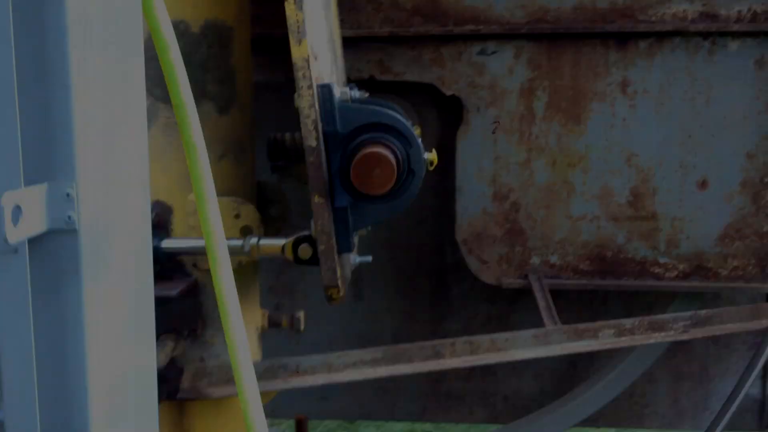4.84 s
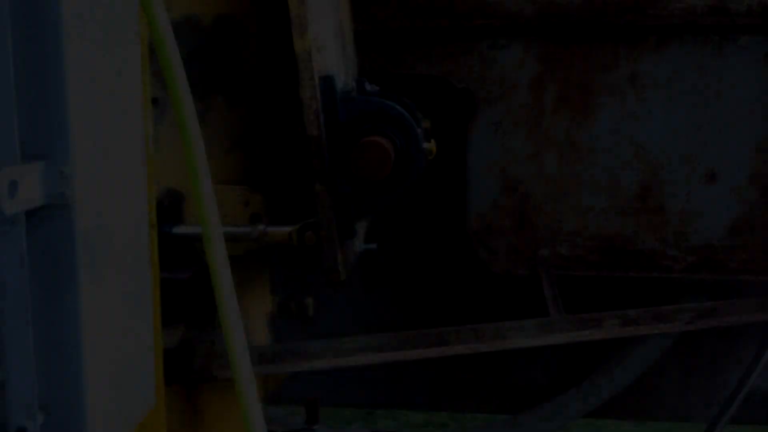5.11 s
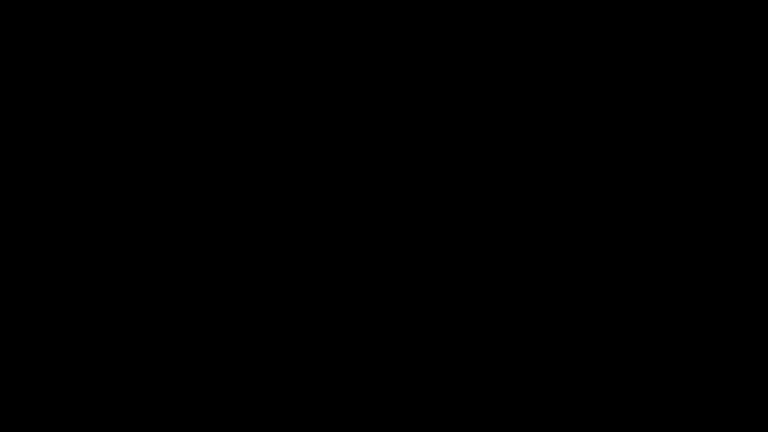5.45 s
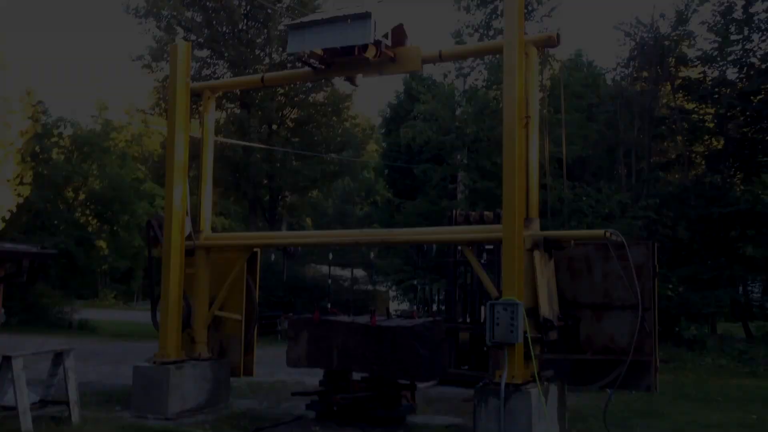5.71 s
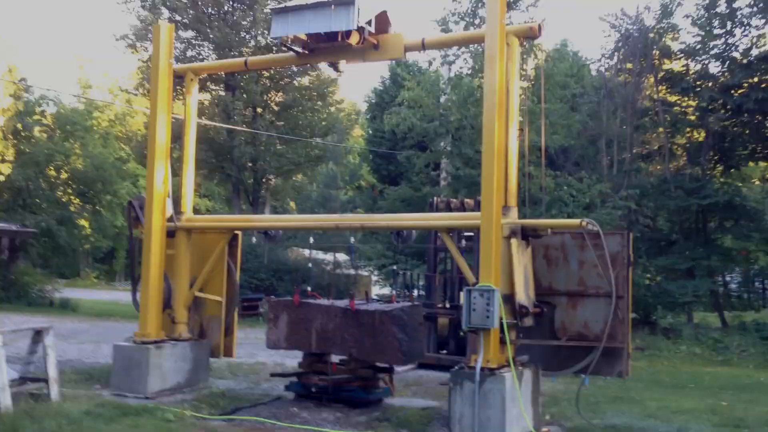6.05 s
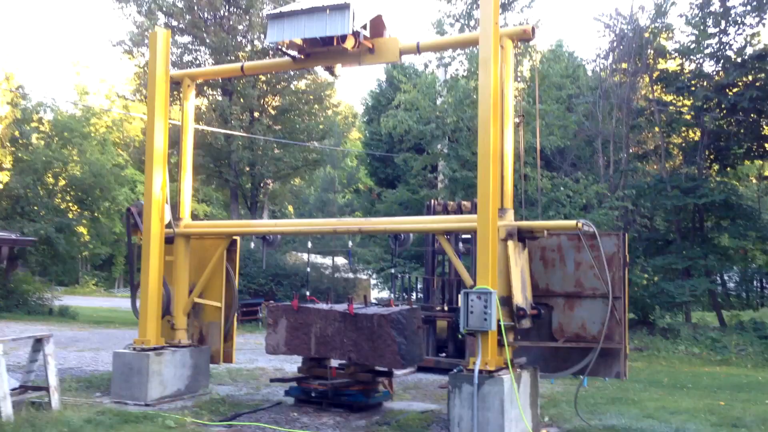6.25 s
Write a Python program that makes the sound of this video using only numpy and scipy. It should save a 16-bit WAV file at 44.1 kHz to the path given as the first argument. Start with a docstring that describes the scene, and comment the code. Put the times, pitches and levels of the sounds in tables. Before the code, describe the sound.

Heard up close outdoors, a running wire grinds through stone with a steady spraying hiss, a rough rasp and small chirping catches. Underneath, the steel frame drones and the motor hums unevenly, with occasional soft knocks. The sound dips to silence for an instant about two thirds through, and the same sawing returns from farther off, with a much weaker hum.

```python
"""An open yard, in mono: a diamond wire saw grinds through a block of stone.
Grit chips the stone and rasps in the cut, beads catch and squeak, slurry hisses off the wire,
the steel frame drones and the drive knocks in it. Once a lap the wire loop bites harder, then runs
slack; at times it skids. Soft, deep thuds sound in the rumble.
The sound fades out beside the machine and fades in again from across the yard."""
import sys
import numpy as np
from scipy import signal
from scipy.fft import rfft, irfft
from scipy.io import wavfile
from scipy.ndimage import uniform_filter1d, map_coordinates

SR = 44100
rng = np.random.default_rng(int(sys.argv[2]) if len(sys.argv) > 2 else 0)


def store_wav(level_fs):
    """Save 16-bit WAV to argv[1]."""
    pcm = np.round(np.clip(np.atleast_2d(level_fs), -1, 1) * 32767)
    wavfile.write(sys.argv[1], SR, pcm.T.astype(np.int16))


N = 338688
T = np.arange(N) / SR
BINS_HZ = np.maximum(np.arange(N // 2 + 1) * SR / N, 1)
MOVE_S, FADE_S = 5.461, .5  # near to far


# wire feed into the stone: t/s, level/dB
NEAR_FEED = [(0, 2), (.55, 0.1), (.75, 0.5), (1.9, 0), (2.25, -0.1), (3.6, -0.35), (4.6, -0.5), (4.95, -2),
             (5.25, -0.7)]
FAR_FEED = [(5.9, -0.95), (6.05, 0.17), (6.35, -0.61), (6.5, 0.32), (6.63, 0.47), (6.72, 1.3), (7, -0.51),
            (7.2, 0.28), (7.35, 2.2), (7.5, 1), (7.62, -1)]
# wire skids: t/s (centre), level/dB, half length/s
SKIDS = [(0.184, -7, 0.027), (0.72, -8, 0.031), (0.98, -3, 0.018), (1.55, -0.5, 0.027), (2.172, -3.5, .025),
         (2.41, -8, 0.01), (2.814, -7.5, 0.042), (3.04, -1.5, 0.038), (3.394, -4, 0.021),
         (3.625, -2, 0.034), (4.936, -3, 0.14), (5.66, -10, .035), (5.94, -6, 0.028), (6.34, -11, 0.025),
         (6.632, -2.5, 0.047), (7.01, -6, 0.041), (7.148, -7, 0.071), (7.575, -4, 0.039)]
def saw(far, bite_s, rasp_db, block_db, hiss_db):
    """Feed, bite and slack press the wire on the stone, which yields unevenly; skids drop the rasp."""
    shaft_hz, slack_lag_s = 28.8, .28
    feed_db = curve(FAR_FEED if far else NEAR_FEED)
    bite = each_lap(bite_s, half_s=.12)
    slack = each_lap(bite_s + slack_lag_s, half_s=.062)
    skid_db = sum(db * np.exp(-((T - s) / half_s) ** 2) for s, db, half_s in SKIDS)
    cut_db = feed_db + .2 * bite - .5 * slack + skid_db + .25 * walk(12)
    wire_db = feed_db + 1.5 * bite + .12 * skid_db
    shaft_rad = 2 * np.pi * shaft_hz * np.cumsum(1 + .0062 * walk(1)) / SR
    pressure_db = contact(shaft_rad, throb_db=.35, slap_db=.15, chatter_db=.4)
    return (undb(cut_db + rasp_db) * rasp(shaft_rad)
            + undb((cut_db + wire_db) / 2 + block_db) * block()
            + undb(wire_db + pressure_db + hiss_db) * hiss(far))


def each_lap(at_s, half_s, lap_s=.67):
    """A swell from 0 to 1 on every lap of the wire loop."""
    away_s = (T - at_s + lap_s / 2) % lap_s - lap_s / 2
    return np.exp(-(away_s / half_s) ** 2)


def contact(shaft_rad, throb_db, slap_db, chatter_db):
    """Wire pressure on the stone in dB: it throbs with the motor shaft and chatters."""
    return throb_db * np.sin(shaft_rad) + slap_db * np.sin(2 * shaft_rad) + chatter_db * walk(21)


# resonances of the wire in the cut: f/Hz, width/Hz, level/dB
CUT_MODES = [(1388.5, 137, -2.5), (1611, 82, -8), (1855, 210, -3), (2215, 155, -1), (2428, 66, 1.5),
             (3440, 230, -8)]
def rasp(shaft_rad, drift=.02, sway_db=1.4, squeak_db=-4, chip_db=-7.5):
    """Grit rings the wire; its modes drift and swell as the beads move along. Loose chips tick."""
    grind = 0
    for hz, width_hz, db in CUT_MODES:
        read_at = np.cumsum(1 + drift * walk(9))
        rung = ring(grit(per_s=4000, spread_db=4.2), hz, width_hz)
        drifting = map_coordinates(rung, [read_at], order=1, mode="wrap")
        grind += undb(db + sway_db * walk(25)) * drifting
    squeak = undb(squeak_db) * squeaks()
    chips = undb(chip_db) * unit(ring(grit(per_s=450, spread_db=4), hz=2150, width_hz=1500))
    pressure_db = contact(shaft_rad, throb_db=1.2, slap_db=-1, chatter_db=.7)
    flutter_db = .5 * walk(23)
    return unit(unit(grind) + squeak + chips) * undb(pressure_db + flutter_db)


def squeaks(per_s=220, range_db=11, mean_s=.02, glide=.06):
    """Beads stick and slip: tiny gliding tones near the modes of the cut."""
    out = np.zeros(N + SR)
    for when, mode, length, size, detune, bend in rng.random((int(per_s * N / SR), 6)):
        start, count = int(when * N), int(SR * mean_s * (.5 + length))
        mode_hz, _, db = CUT_MODES[int(mode * len(CUT_MODES))]
        hz = mode_hz * (1 + .1955 * (detune - .5) + glide * (bend - .5) * np.linspace(-1, 1, count))
        tone = np.sin(2 * np.pi * np.cumsum(hz) / SR)
        out[start:start + count] += undb(db + range_db * size) * np.hanning(count) * tone
    return unit(out[:N])


# caught beads, and knocks in the stone block near 800 Hz: t/s (centre), level/dB, f/Hz, half length/s,
# glide/(oct per half length), width/f
CATCHES = [(0.017, -29, 1690, 0.035, -0.05, .5), (0.061, -29, 2430, 0.02, .08, 0.37),
           (0.194, -25.5, 2600, 0.008, -0.072, .22), (0.207, -29, 2230, .008, 0, .25),
           (0.249, -27, 2400, 0.011, 0, 0.39), (0.269, -26, 2300, 0.022, -0.118, 0.18),
           (0.278, -29, 1900, .012, 0.028, .25), (0.297, -29, 1750, 0.012, 0, 0.94),
           (0.354, -23.5, 2160, 0.0098, -0.25, 0.4), (0.39, -38, 2350, .012, 0, .25),
           (0.522, -28, 2240, 0.01, 0, 0.13), (0.153, -33.5, 4710, 0.19, 0, 0.57),
           (0.536, -33, 5320, 0.045, 0, .4), (0.646, -27, 2050, 0.015, 0, 0.45),
           (0.874, -28, 1710, 0.036, 0.094, 0.46), (0.888, -34, 807, 0.034, 0.013, 0.27),
           (0.946, -31, 2260, 0.011, 0, .3), (1.11, -32, 1445, 0.014, 0.048, .3),
           (1.162, -29, 4980, 0.04, 0.1, 0.35), (1.28, -27, 1704, 0.031, -0.035, 0.45),
           (1.273, -27.5, 2090, 0.054, -0.061, 0.64), (1.45, -30, 1494, 0.02, 0, 0.36),
           (1.635, -30, 1980, 0.017, -0.031, .5), (1.814, -30, 1950, 0.045, 0.016, .5),
           (1.933, -30, 1655, 0.032, 0, 0.54), (1.921, -36, 788, 0.066, 0, .2),
           (1.99, -32, 2110, .02, -0.046, .4), (2.056, -31, 1600, 0.014, 0.02, .4),
           (2.255, -36, 2200, .02, -0.07, .3), (2.379, -28, 2250, 0.0091, 0, .4),
           (2.472, -32, 2200, .014, 0, 0.37), (2.513, -32, 2160, .028, 0, 0.68),
           (2.708, -27.5, 1690, 0.03, 0.015, 0.46), (2.904, -36, 820, .03, -0.028, .25),
           (2.946, -33, 2320, 0.035, 0, .35), (2.966, -29, 1350, 0.018, 0, 0.18),
           (3.143, -29.5, 2200, 0.015, 0, .35), (3.243, -29, 2300, .025, -0.017, 0.49),
           (3.253, -32, 4330, 0.041, 0, 0.55), (3.259, -37, 790, .05, -0.033, 0.24),
           (3.48, -34, 2330, .008, 0.03, .12), (3.561, -31, 2140, 0.028, .05, .3),
           (3.765, -42, 2150, 0.011, 0, .3), (3.862, -32, 800, 0.019, 0, .25),
           (3.893, -29, 2710, 0.032, -0.014, 0.98), (4.074, -28, 1526, .013, 0.013, 0.43),
           (4.077, -32, 795, 0.022, 0, .25), (4.276, -30, 4500, 0.02, 0, 0.59),
           (4.404, -30, 1900, .011, -0.045, .4), (4.608, -29, 4420, 0.021, 0.056, 0.5),
           (4.601, -32, 2200, 0.035, 0.019, .5), (4.652, -29, 1400, 0.015, 0, .25),
           (4.81, -31, 2050, 0.043, 0, 0.55), (5.048, -33.5, 800, 0.024, 0, 0.19),
           (5.06, -32, 1880, 0.037, -0.063, 0.51), (5.725, -34, 1914, 0.022, 0, 0.51),
           (5.872, -35, 2210, 0.018, -0.02, .25), (6.051, -36, 1640, 0.024, 0, 0.38),
           (6.139, -37, 1990, 0.041, 0, .5), (6.295, -34, 3900, 0.02, -0.045, 0.29),
           (6.44, -39, 2150, .025, 0, 0.32), (6.52, -34, 3650, 0.029, 0.025, .2),
           (6.555, -35, 2000, 0.023, 0.017, 0.42), (6.704, -31, 1960, 0.018, 0, .45),
           (6.721, -32, 4390, 0.055, -0.0073, 0.62), (6.845, -32, 3730, 0.021, -0.025, .25),
           (6.841, -35, 1900, 0.026, 0.012, .45), (6.935, -35.5, 1453, 0.019, 0, 0.18),
           (6.933, -35, 2260, .022, 0, 0.18), (7.067, -38, 2100, .022, 0.012, 0.36),
           (7.25, -33, 2135, 0.021, 0.02, .3), (7.419, -37, 3970, .11, 0, .35),
           (7.403, -36.5, 2146, 0.098, 0, 0.22), (7.65, -40, 2280, .018, -0.022, 0.22)]
def catches(gain_db, ragged_db):
    """A bead snags and scrapes through: a ragged, sliding chirr. Narrow ones squeak. The rows near 800 Hz are
    knocks in the stone block."""
    out = np.zeros(N)
    for s, db, hz, half_s, glide_oct, width in CATCHES:
        span = np.abs(T - s) < 3 * half_s
        along = (T[span] - s) / half_s
        noise = rng.standard_normal((len(along), 2)) @ [1, 1j]
        chirr = signal.sosfilt(signal.butter(4, width * hz / 2, fs=SR, output="sos"), noise)
        levelled = chirr / np.sqrt(uniform_filter1d(np.abs(chirr) ** 2, int(half_s * SR)))
        carrier = np.exp(2j * np.pi * np.cumsum(hz * 2 ** (glide_oct * along)) / SR)
        out[span] += undb(db + gain_db) * np.exp(-along ** 2) * unit((levelled * carrier).real)
    return out * undb(ragged_db * walk(70))


# hiss spectra, the far one notched by the ground reflection: f/Hz, level/dB
NEAR_HISS = [(30, -13), (150, 2), (480, -3.5), (1080, -4), (1500, 1), (2600, -1.5), (2950, -0.2),
             (3300, 0.5), (5750, 0), (6400, -4), (8000, -6.5), (10000, -10), (15000, -17)]
FAR_HISS = [(30, -23), (75, -3), (210, -0.5), (330, -9), (1200, -10), (2000, -3.5), (2400, -5.5),
            (2600, -8.5), (2780, -4.5), (2970, -7.5), (3200, -2), (3800, 0.5), (5100, -4.5), (6400, -6),
            (7600, -10.5), (9000, -11), (13500, -21), (15000, -26)]
# flicker band centres: f/Hz
HISS_BANDS = [700, 1600, 3000, 4200, 5800, 9000, 14000]
def hiss(far, slurry_db=1.5, flicker_db=.4):
    """Fine chips and slurry spray off the running wire; each band flickers by itself."""
    spray = unit(grit(per_s=12000, spread_db=2) + undb(slurry_db) * rng.standard_normal(N))
    hz, db = np.transpose(FAR_HISS if far else NEAR_HISS)
    spectrum = rfft(spray) * undb(np.interp(np.log(BINS_HZ), np.log(hz), db))
    weights = (np.interp(BINS_HZ, HISS_BANDS, row) for row in np.eye(len(HISS_BANDS)))
    bands = (irfft(spectrum * weight, N) for weight in weights)
    return face_reflection(sum(band * undb(flicker_db * walk(29)) for band in bands))


def face_reflection(x, delay_s=.0014, sway_s=.0002, echo_db=-14.5):
    """The stone face reflects the sound; the comb notches shift as the wire sways."""
    echo_time_s = T - delay_s - sway_s * walk(6)
    return unit(x + undb(echo_db) * map_coordinates(x, [echo_time_s * SR], order=3, mode="mirror"))


# stone block resonances: f/Hz, width/Hz, level/dB
BLOCK_MODES = [(330.5, 78, -3.5), (394.5, 25, -4), (596.6, 45, -4.5), (795, 156, -0.5)]
def block(sway_db=1.63):
    """The grinding roars dully through the stone."""
    return resonate(BLOCK_MODES, per_s=9000, spread_db=3.5) * undb(sway_db * walk(7.6))


# beam and guard resonances: f/Hz, width/Hz, level/dB
FRAME_MODES = [(131, 43, -1.5), (157.2, 17, 3.5), (175.2, 31, 1), (211.6, 27, -1.5)]
# upper drive tones: f/Hz, level/dB re frame shake
DRIVE_TONES = [(152.5, -9.5), (201.8, -9), (599, -22.5), (800, -25)]
# frame drone envelopes: t/s, level/dB
NEAR_DRONE = [(0, -35), (.3, -33.5), (.55, -31.5), (.9, -32), (1.17, -29), (1.5, -30.5), (1.73, -31.5),
              (2, -27), (2.3, -30), (2.75, -30.5), (3.15, -29.5), (3.7, -32), (4.1, -33), (4.35, -31),
              (4.7, -34), (5, -35), (5.25, -33.5)]
FAR_DRONE = [(5.9, -45.5), (6.6, -42), (7.6, -39.5)]
# drive hum envelopes: t/s, level/dB
NEAR_HUM = [(0, -28), (.12, -33), (.22, -43), (.45, -31), (.56, -25), (.7, -26.5), (.78, -35), (.88, -29.5),
            (.96, -42), (1.02, -27), (1.12, -27.5), (1.22, -36), (1.4, -29), (1.5, -33), (1.75, -40),
            (1.84, -26.5), (1.93, -41), (2.2, -34), (2.3, -30.5), (2.6, -34), (2.76, -27.5), (2.84, -43),
            (2.93, -27), (3.02, -25), (3.09, -31), (3.3, -29), (3.4, -40), (3.8, -33.5), (3.88, -29),
            (4.07, -31), (4.2, -32.5), (4.3, -32), (4.42, -41), (4.78, -40), (4.86, -35.5), (5.08, -33),
            (5.2, -43)]
FAR_HUM = [(5.9, -49.5), (7.6, -39.5)]
def drone(far, frame_db, hum_db):
    """The drone throbs about nineteen times a second; the frame shakes and the drive hums through it as its
    load wavers."""
    hum_hz, throb_hz, throb_db, waver = 132.2, 19.4, 1.2, .012
    throb = np.sin(2 * np.pi * throb_hz * np.cumsum(1 + waver * walk(2)) / SR)
    lumps = undb(throb_db * throb + .6 * walk(30))
    shake = resonate(FRAME_MODES, per_s=1500, spread_db=3)
    drive_time_s = np.cumsum(1 + waver * walk(3.54)) / SR

    def tone(hz):
        return np.sqrt(2) * np.sin(2 * np.pi * (hz * drive_time_s + rng.random()))

    upper_tones = sum(undb(db + 1.5 * walk(7.3)) * tone(hz) for hz, db in DRIVE_TONES)
    frame_gain = undb(curve(FAR_DRONE if far else NEAR_DRONE) + frame_db)
    hum_gain = undb(curve(FAR_HUM if far else NEAR_HUM) + hum_db)
    return frame_gain * unit(shake * lumps + upper_tones) + hum_gain * lumps * tone(hum_hz)


# drive knocks: t/s, level/dB (peak), f/Hz
KNOCKS = [(1.085, -19, 150), (1.182, -22, 170), (1.328, -23, 145), (1.434, -19, 140), (4.347, -24, 170),
          (4.976, -25, 150)]
def knocks():
    """The drive knocks in the beams: a few low cycles that die at once."""
    out = np.zeros(N)
    for s, db, hz in KNOCKS:
        knock = ring(signal.unit_impulse(N, int(s * SR)), hz, width_hz=76)
        out += undb(db) * knock / np.abs(knock).max()
    return out


# soft, deep thuds in the rumble: t/s, level/dB
LOW_THUDS = [(.86, -35), (1.11, -31), (1.2, -31), (1.66, -29), (1.72, -29), (2.16, -31), (2.37, -29),
             (2.79, -26), (3.26, -27), (3.53, -26), (4.3, -34), (4.379, -29), (7.63, -28)]
# whole-frame resonances: f/Hz, width/Hz, level/dB
DEEP_MODES = [(60, 15, -1), (83, 28, 1)]
def rumble(shudder_db):
    """The whole frame shudders on its deep modes, with a soft thud now and then."""
    impulses = np.zeros(N)
    for s, db in LOW_THUDS:
        impulses[int(s * SR)] = undb(db)
    thuds = sum(undb(db) * ring(impulses, hz, width_hz) for hz, width_hz, db in DEEP_MODES)
    thuds *= impulses.max() / np.abs(thuds).max()
    shudder = resonate(DEEP_MODES, per_s=280, spread_db=5.5)
    envelope_db = np.where(T < MOVE_S, curve(NEAR_DRONE), curve(FAR_DRONE))
    return thuds + undb(envelope_db + shudder_db) * shudder


def grit(per_s, spread_db):
    """Diamond grains chip the stone: dense clicks of unequal size."""
    struck = rng.random(N) < per_s / SR
    return unit(struck * rng.choice([-1, 1], N) * undb(spread_db * rng.standard_normal(N)))


def resonate(modes, per_s, spread_db):
    """Each mode is rung by the grains on its own stretch of wire."""
    return unit(sum(undb(db) * ring(grit(per_s, spread_db), hz, width_hz) for hz, width_hz, db in modes))


def ring(x, hz, width_hz):
    """Steep resonance: two equal band-passes in series."""
    detune = (BINS_HZ ** 2 - hz ** 2) / (BINS_HZ * width_hz * np.pi / 2)
    return irfft(rfft(x) / (1 + 1j * detune) ** 2, N)


def walk(rate_hz):
    """Smooth random motion, rms 1."""
    return unit(irfft(rfft(rng.standard_normal(N)) * np.exp(-(BINS_HZ / rate_hz) ** 2), N))


def curve(table):
    """Linear envelope through (t/s, value) points."""
    return np.interp(T, *np.transpose(table))


def undb(db):
    """dB to gain."""
    return 10 ** (np.asarray(db) / 20)


def unit(x):
    """Scale to rms 1."""
    return x / np.sqrt(np.mean(x ** 2))


def scene():
    """Beside the machine, then across the yard; both channels alike."""
    near = saw(far=False, bite_s=.52, rasp_db=-33, block_db=-38.5, hiss_db=-28)
    near += drone(far=False, frame_db=1, hum_db=-2.05)
    far = saw(far=True, bite_s=4.4, rasp_db=-38, block_db=-48.5, hiss_db=-32)
    far += drone(far=True, frame_db=-2.5, hum_db=-7.5)
    mono = np.where(T < MOVE_S, near, far)
    mono += rumble(shudder_db=-14) + knocks() + catches(gain_db=-1, ragged_db=-.5)
    return np.array([mono, mono])


def record(dry):
    """Linear fade to silence and back between the two standpoints; low-pass at 15.5 kHz."""
    fade = np.minimum(np.abs(T - MOVE_S) / FADE_S, 1)
    return signal.sosfilt(signal.ellip(10, .2, 80, 15500, fs=SR, output="sos"), dry * fade)


dry = scene()
out = record(dry)
store_wav(out)
```